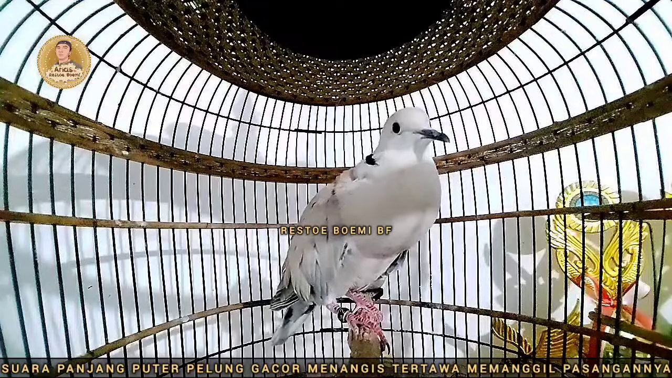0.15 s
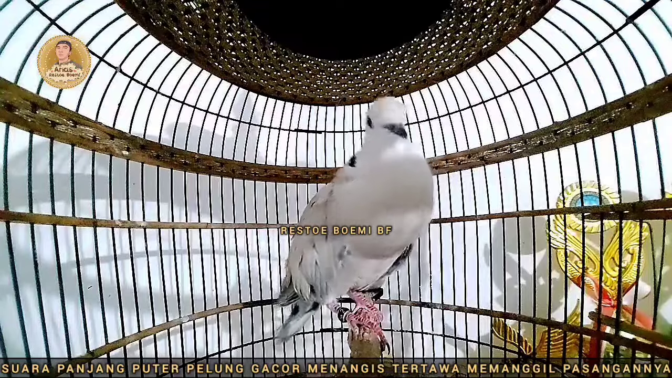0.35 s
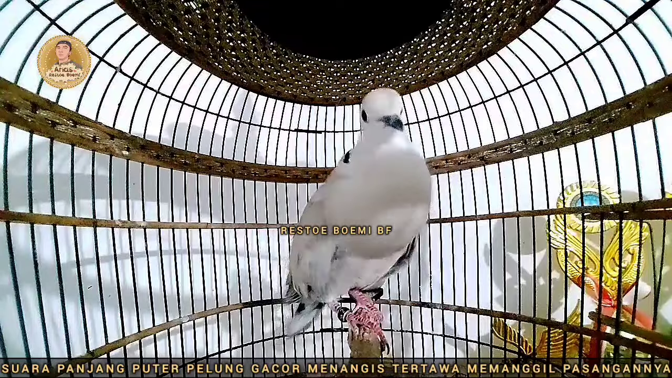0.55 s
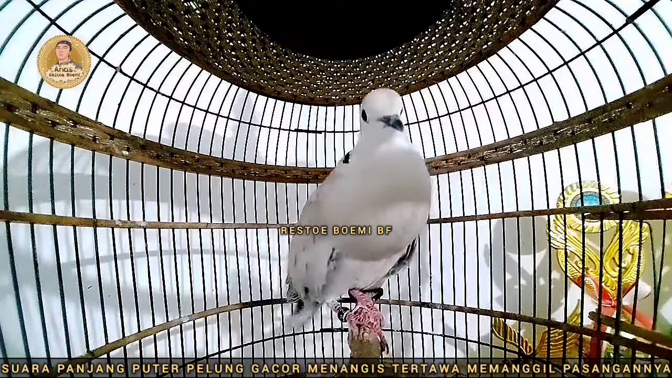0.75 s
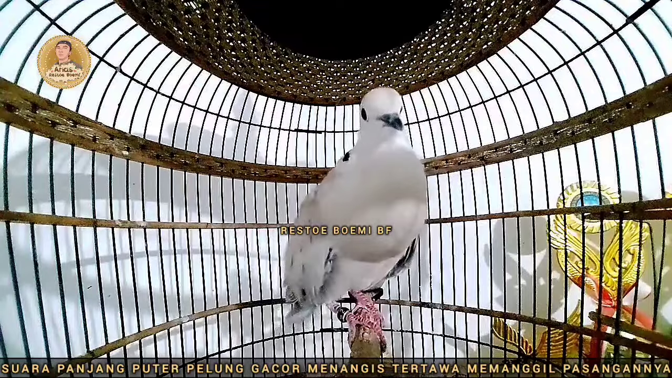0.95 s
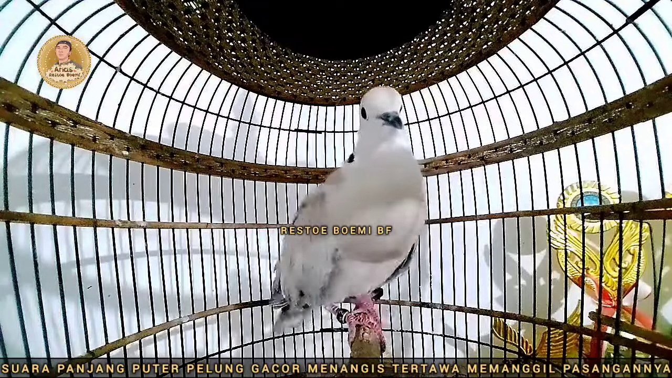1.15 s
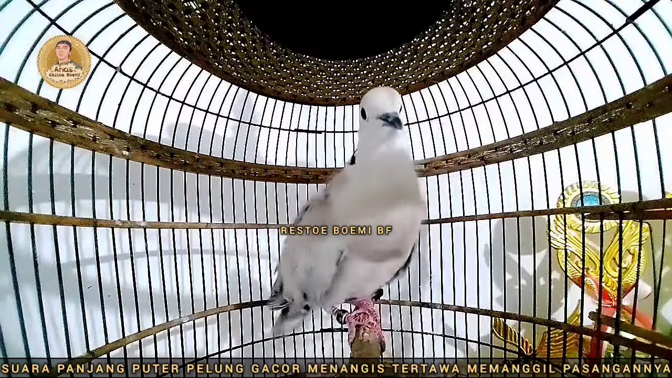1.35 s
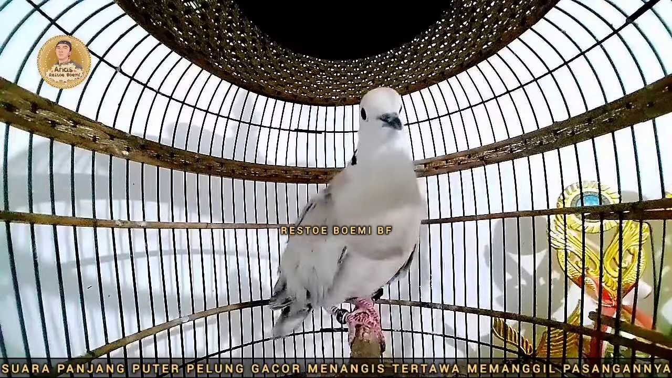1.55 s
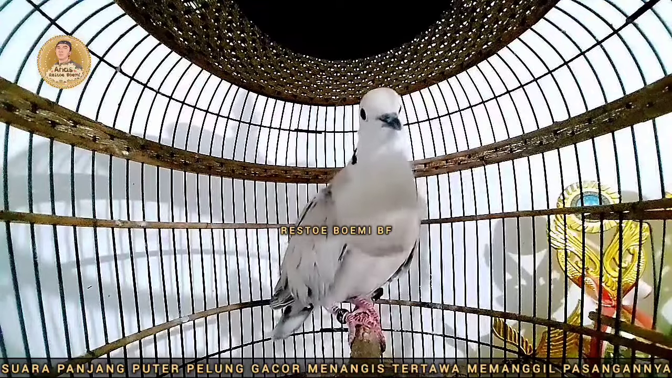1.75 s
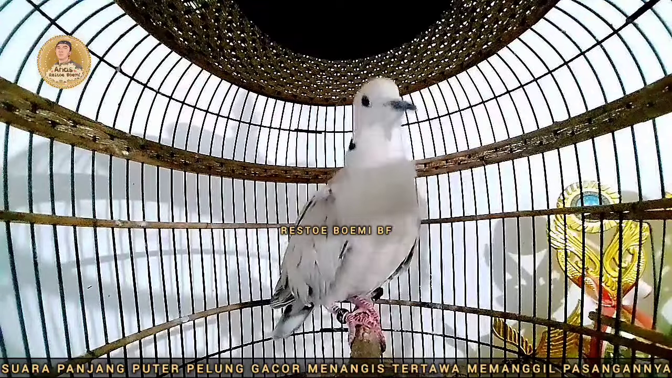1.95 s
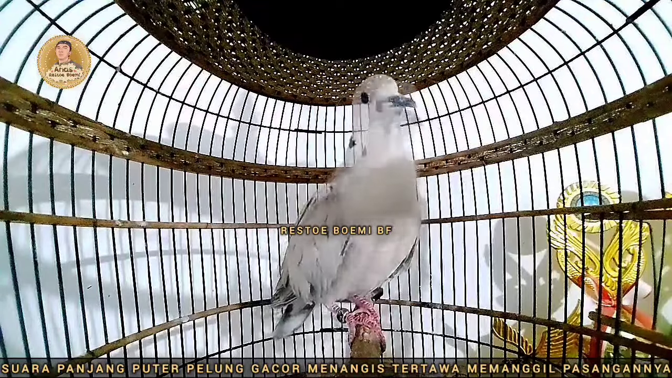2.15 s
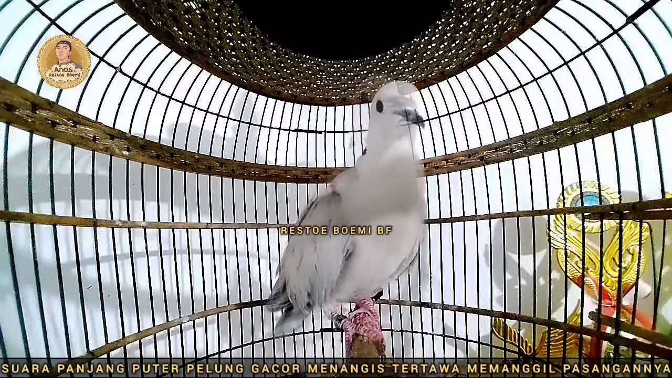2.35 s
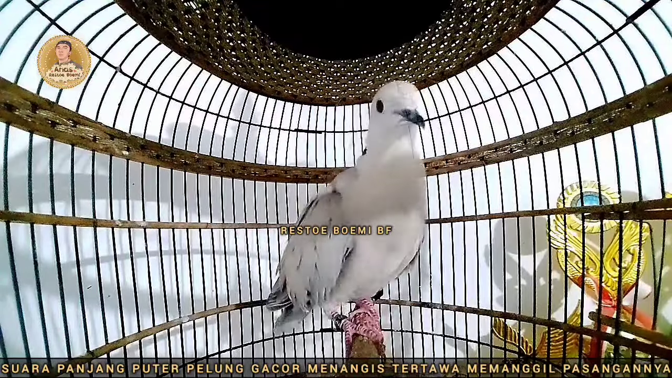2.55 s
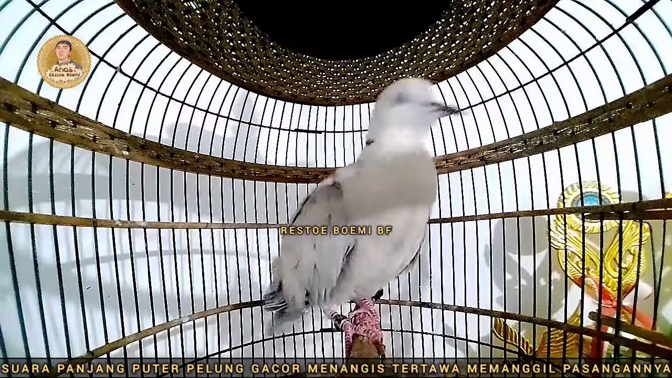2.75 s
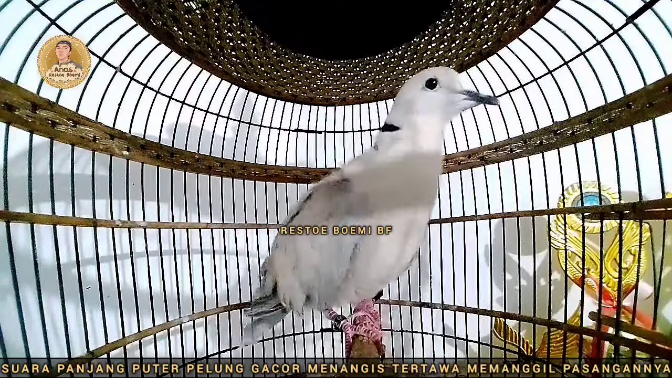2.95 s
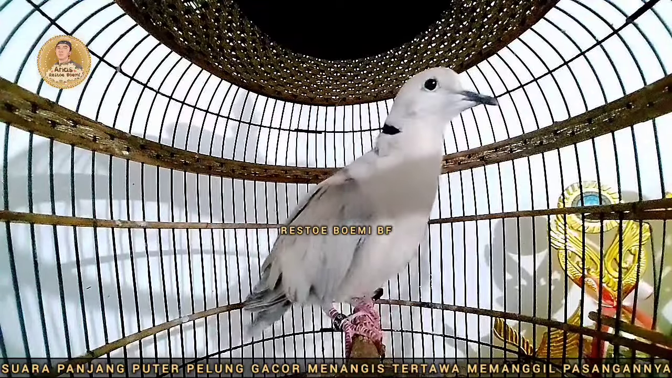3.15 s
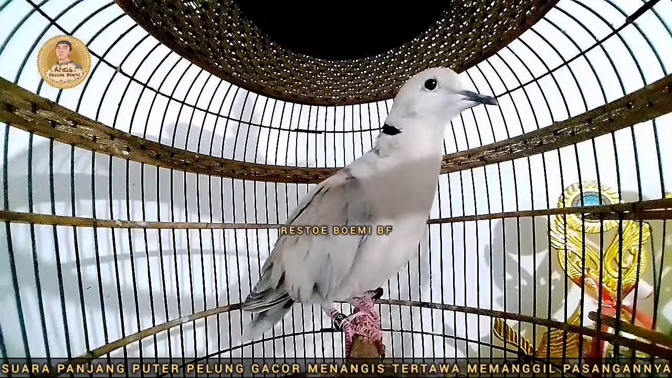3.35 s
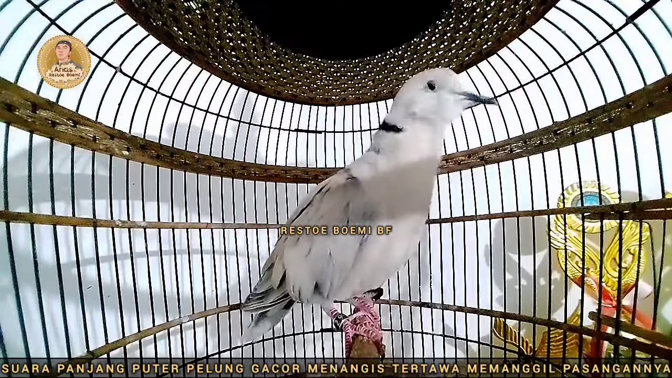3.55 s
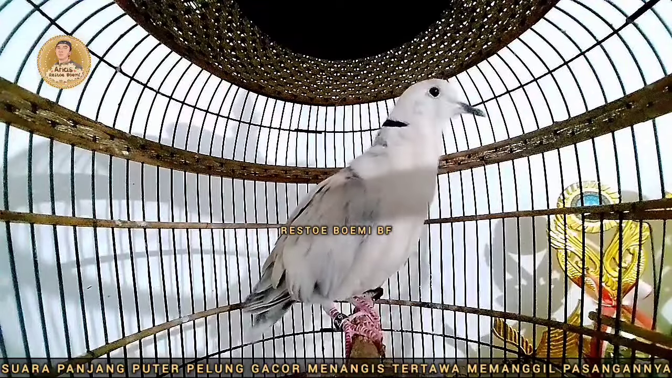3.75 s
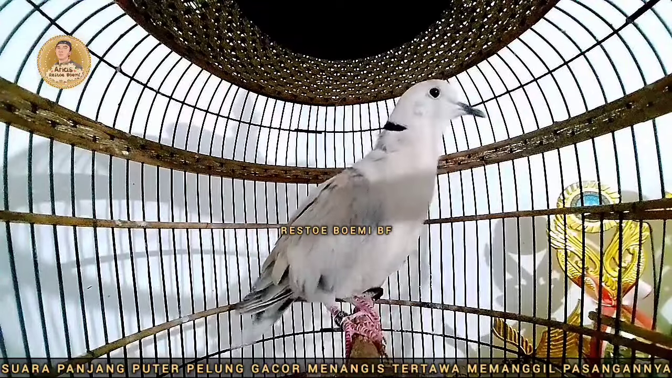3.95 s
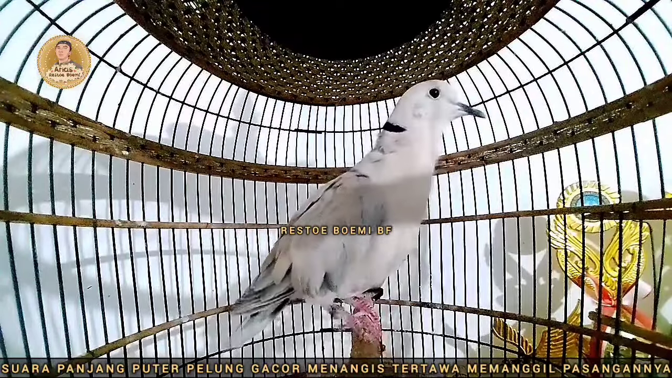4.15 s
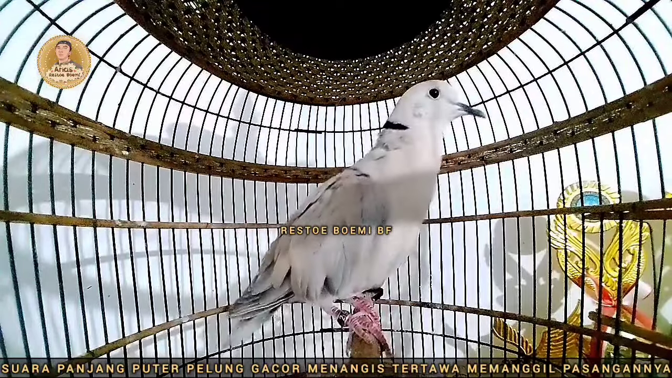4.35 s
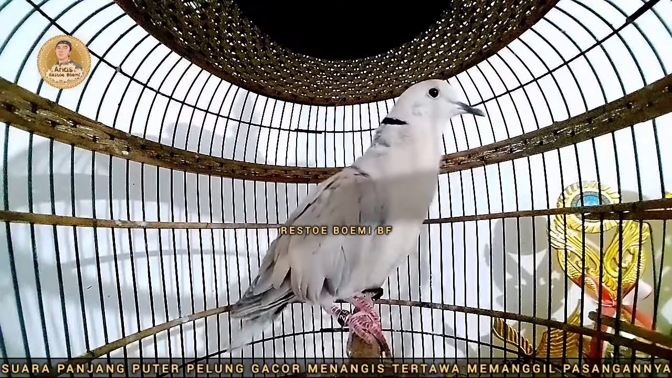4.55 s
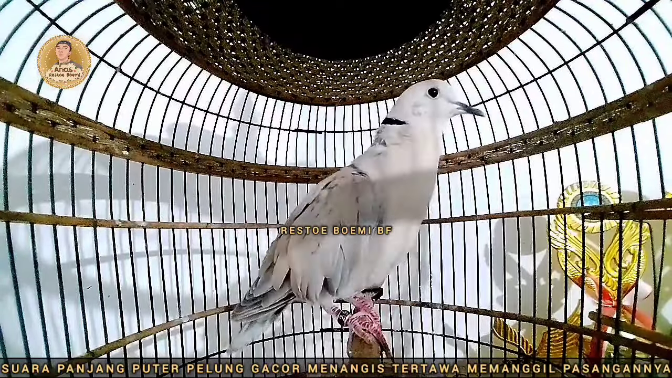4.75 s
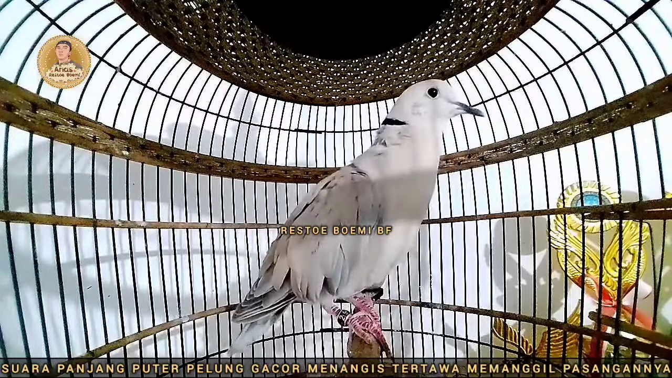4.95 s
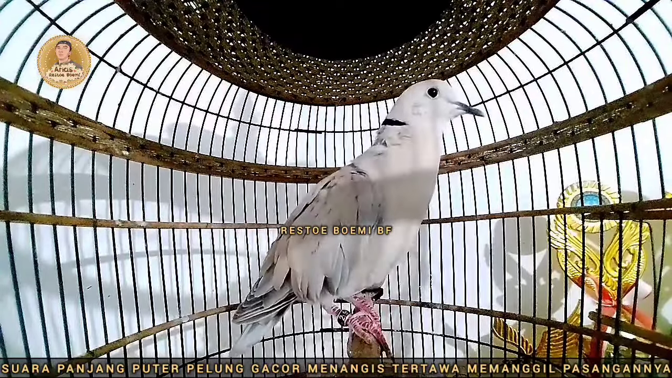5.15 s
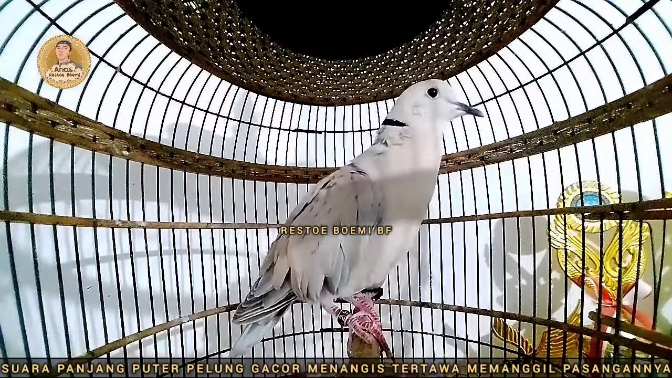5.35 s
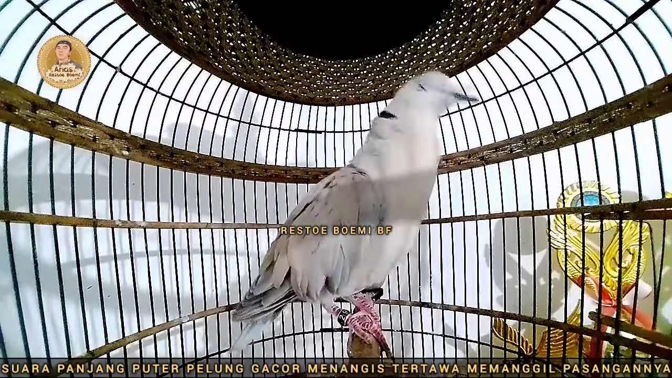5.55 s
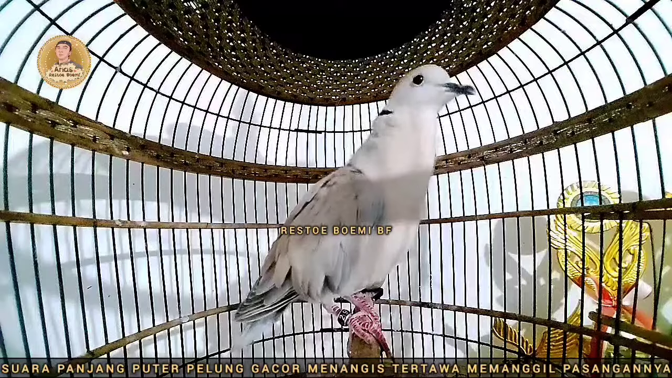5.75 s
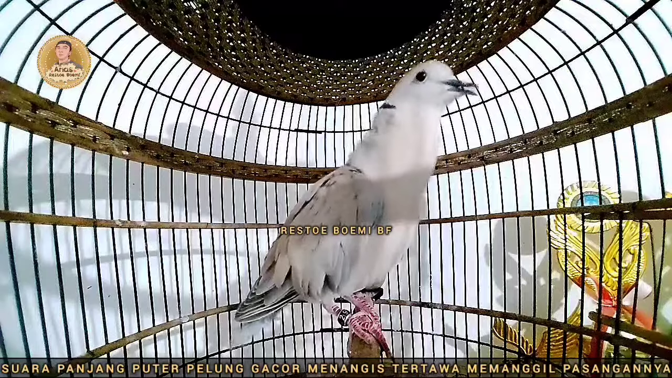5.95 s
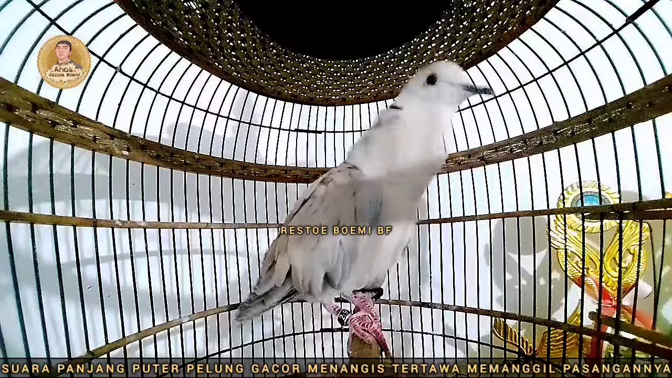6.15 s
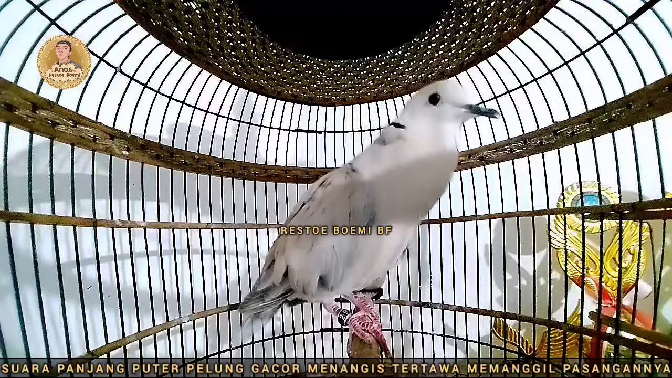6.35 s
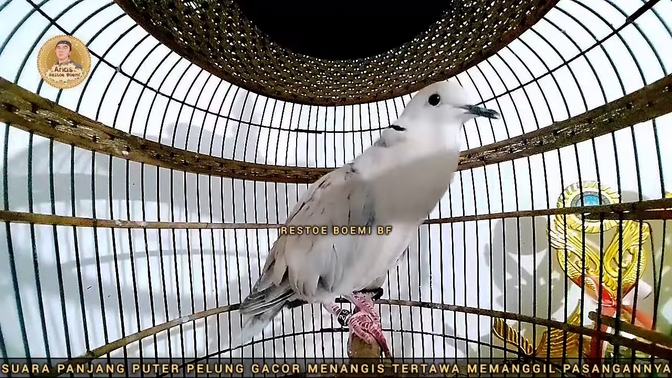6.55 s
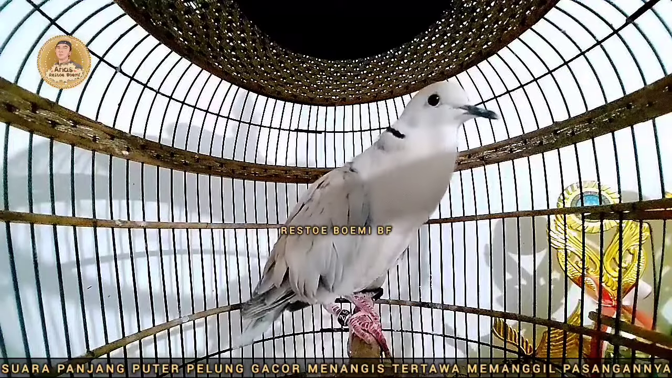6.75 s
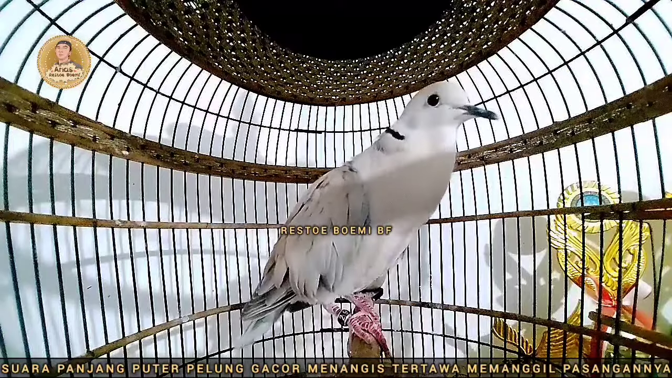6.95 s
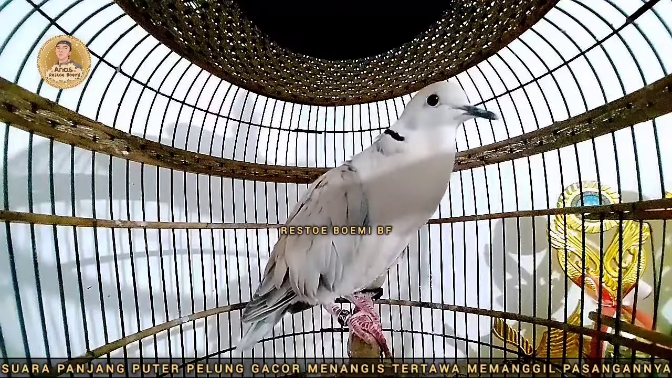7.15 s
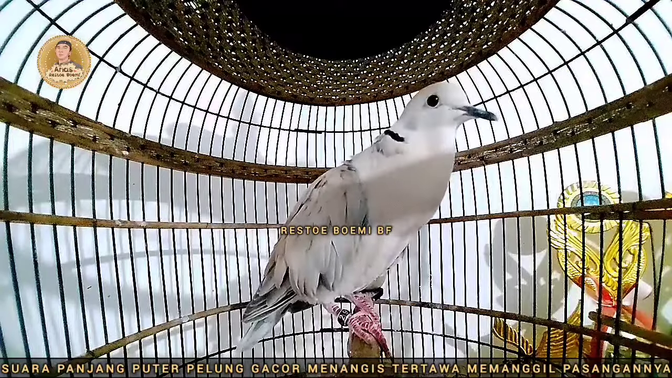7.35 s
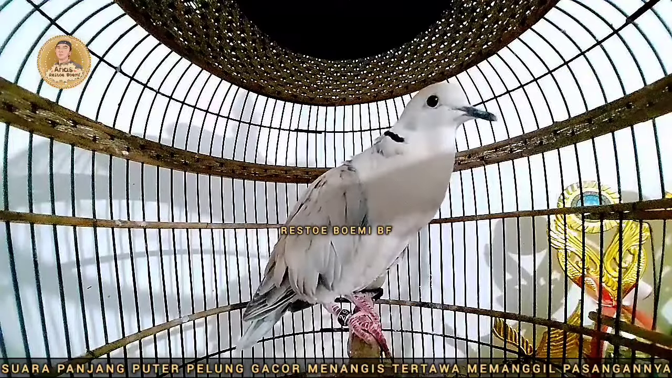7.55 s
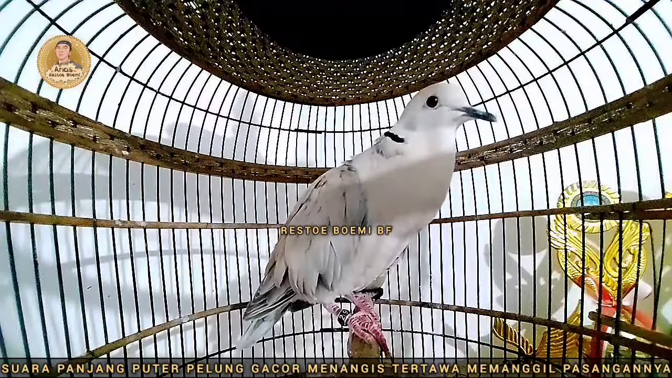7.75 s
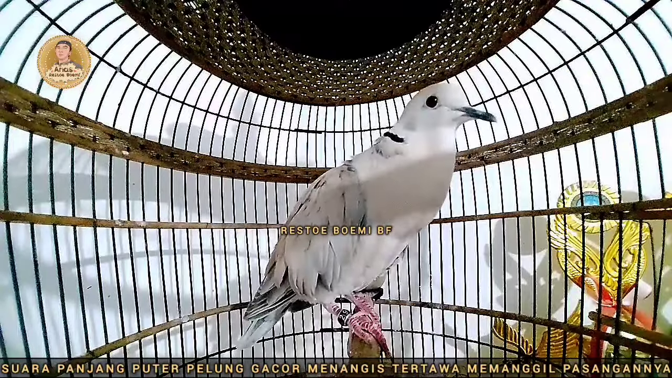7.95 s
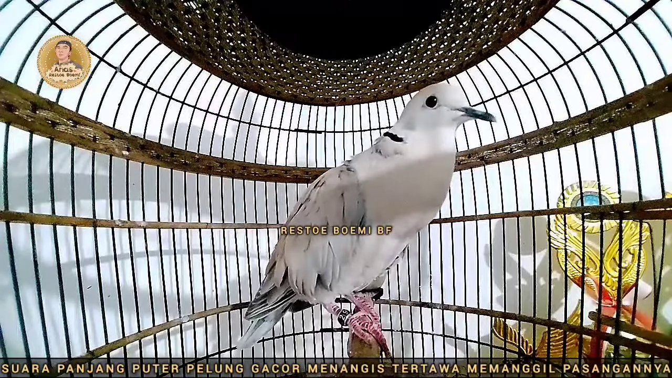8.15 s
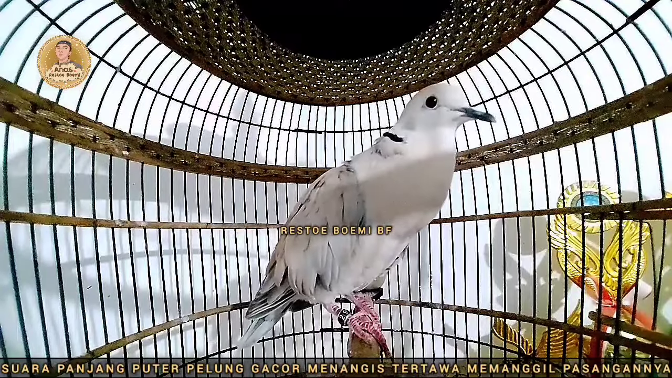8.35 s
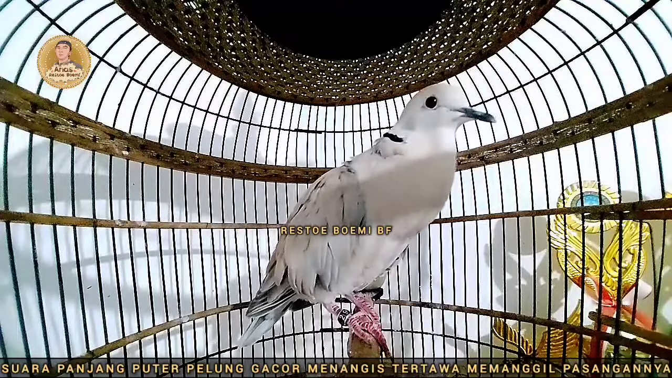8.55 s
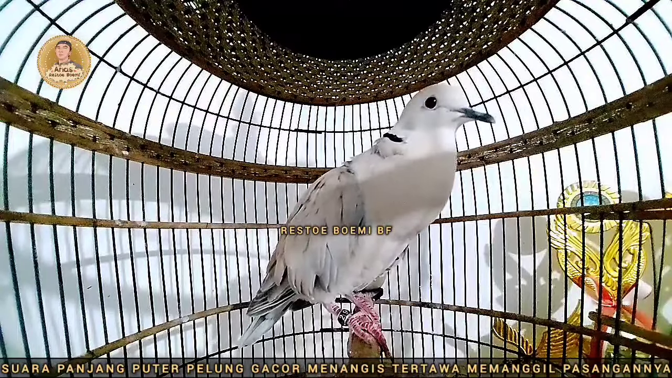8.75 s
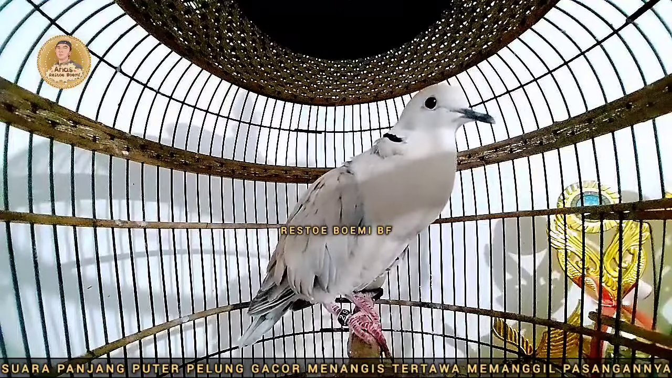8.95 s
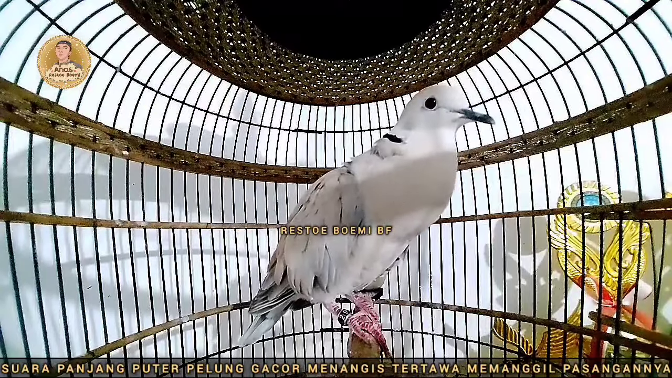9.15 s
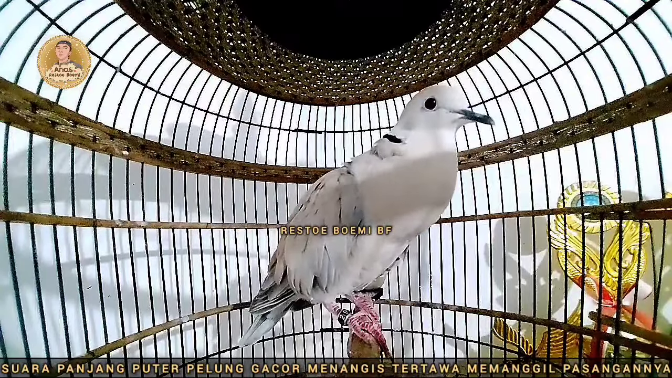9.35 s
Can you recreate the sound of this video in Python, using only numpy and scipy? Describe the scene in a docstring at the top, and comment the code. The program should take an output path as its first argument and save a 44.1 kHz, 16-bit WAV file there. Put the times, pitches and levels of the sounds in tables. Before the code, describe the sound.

A dove calls close to the microphone in a cage, with a short room tail, low outdoor rumble and faint hiss. At 0 s a brief low moan drops and fades; from 0.6 to 1.9 s a longer, reedy moan wavers and falls, with tiny beak and claw ticks. From 2.2 to 3.5 s comes a bouncing, buzzy laugh of nine quick swooping notes, rising in pitch then sinking and fading; it repeats at 4.5-5.8 s with similar ticks. Far off, another dove coos softly around 2 s and 3.5-6 s, and blurred echoing cries surface near 4 and 8 s. At 6.2 s a hoarse two-toned growl swells, breaks lower and sighs out by 6.8 s. Stuttered syllables lengthen from 6.9 s, opening at 7.4 s into a long hollow coo, slightly husky at first, growing louder, purer and steadier, creeping up in pitch and still held at about 9.4 s.

```python
"""Over a low rumble and faint hiss, a close caged dove gives two falling moans: harmonics swept through its crop.
From 2.2 s the same bouncing, buzzy laugh comes twice, while farther birds call as soft tones and echoing noise.
Past 6 s two beating voices rasp through a hoarse note, then a stutter that opens into one long coo, nearly
pure and ever steadier. Ticks of noise from the cage are scattered through the moans and both laughs."""
import sys
import numpy as np
from scipy import signal
from scipy.fft import rfft, irfft, next_fast_len
from scipy.io import wavfile
from scipy.ndimage import map_coordinates

SR = 44100
rng = np.random.default_rng(int(sys.argv[2]) if len(sys.argv) > 2 else 0)


def transcribe(u):
    """Save the signal u as a 16-bit wav file named by the first command-line argument.

    u: samples, shape (n,) or (channels, n), limited to [-1, 1]; the rate is SR.
    q: integer samples, one column per channel.
    """
    v = np.clip(np.atleast_2d(u).T, -1, 1)
    q = np.round(v * 32767).astype(np.int16)
    wavfile.write(sys.argv[1], SR, q)


N = 418509
TIME = np.arange(N) / SR
TOP_HZ = 15800  # band limit

# Slow rise and fall of the rumble: time_s, level_db
RUMBLE_LEVEL = [(.2, -54.5), (3.7, -55.5), (4.2, -50.5), (5.7, -56), (6.8, -54), (7.3, -50), (9.4, -48.5)]
# Spectrum of the outdoor rumble: frequency_hz, gain_db
RUMBLE = [(25, -17.5), (42, -1), (100, -1), (135, -6.5), (170, -20), (280, -23.5), (700, -35.5),
          (1500, -67)]
# Spectrum of the faint hiss: frequency_hz, gain_db
HISS = [(250, 10.5), (500, 29), (900, 9), (2000, -0.5), (5000, -9), (7500, -2), (10000, -5.5),
        (15000, -4.5)]
# Decay of the room tail: frequency_hz, t60_s
ROOM = [(500, 0.59), (8000, 0.019)]

# A farther dove, one list per coo: time_s, pitch_hz, level_db
FAR_COOS = [
    [(1.9, 438, -56.5), (2.3, 442, -55)],
    [(3.45, 558, -66.5), (4.1, 562, -46.5), (4.4, 560.6, -54.5), (4.9, 540.4, -48), (5.42, 517.6, -45.5),
     (6.12, 478, -69.5)],
]
# Echoing cries: start_s, end_s, level_db
FAR_CRIES = [(3.881, 4.251, -44.5), (7.901, 8.27, -42.5)]
# Spectrum of a cry: frequency_hz, gain_db
CRY = [(750, -24), (1000, -10.5), (1130, 6), (1350, -13.5), (1900, -47)]

# Ticks of beak and claws: start_s, level_db, body_db (low part relative to level_db)
TICKS = [(0.6646, -51, -10), (0.7043, -42, -10.5), (1.2458, -50.5, -21), (1.276, -45.5, 1.5),
         (2.073, -55.5, -7), (2.1173, -51, -14), (2.3329, -50, -8.5), (2.8298, -43, -12.5),
         (2.9582, -46.5, -15.5), (3.053, -50.5, -16.5), (3.4332, -48.5, -6.5)]
LAUGH_TICKS_FROM_S = 2  # later ticks belong to the laugh and come again with it

# Pitch and effort of the moans, one list per moan: time_s, pitch_hz, effort_db
MOANS = [
    [(0, 194.3, -19.5), (.13, 165.4, -31), (.255, 150.3, -37.5)],
    [(.625, 246, -41), (.69, 229, -33), (.89, 244.5, -31), (1.02, 234.5, -31.5), (1.2, 214.4, -29.5),
     (1.46, 190.1, -32.5), (1.69, 197.2, -31), (1.79, 189, -31.5), (1.92, 163, -54.5)],
]
# Gain of all harmonics but the second, one per moan: gain_db
MOAN_OVERTONE_DB = [-22.5, -0.5]
# Resonances of the swollen crop: centre_hz, half_width_hz, gain_db
CROP = [(252, 28, -10), (376.4, 78, -8), (484, 40.5, 1.5), (635.7, 26.4, 4), (784, 31, -8.5),
        (875, 40, -22.5), (1040, 77, -25)]
# Throat colour of the moan's buzz: frequency_hz, gain_db
MOAN_BUZZ = [(1400, 3), (1700, 1), (2000, -20), (2420, -1.5), (2900, -10.5), (3950, -12.5), (4330, 5),
             (4750, -41), (6200, -38), (7000, -3), (8200, -30), (9300, -9.5), (10500, -31)]
MOAN_BUZZ_DB, MOAN_BUZZ_HZ = -27, 246.6  # buzz over effort, at this pitch
MOAN_BUZZ_DB_PER_HZ = 0.46  # growth of the buzz with pitch
MOAN_BUZZ_RISE_S = 0.21  # the buzz comes in late

# Notes of the laugh: catch_s, top_hz, level_db, buzz_db
LAUGH = [(2.284, 545, -39, -47.5), (2.393, 610, -36, -46), (2.528, 640, -36.5, -43), (2.673, 672, -37, -41),
         (2.83, 640, -37.5, -42.5), (3.006, 626, -40.5, -49), (3.179, 592, -41, -53.5),
         (3.358, 505, -47.5, -60.5), (3.516, 395, -64.5, -68.5)]
# Delay of each laugh: delay_s
LAUGH_DELAYS = [0, 2.2498]
# Throat colour of the laugh's buzz and air: frequency_hz, gain_db
LAUGH_BUZZ = [(900, 4), (1250, -2), (1550, -7.5), (1850, -7.5), (2100, -9), (2550, 0), (3200, -1),
              (4500, -6), (5100, -12), (5600, -20), (7000, -22.5), (9000, -30.5), (15000, -31)]
LAUGH_START_S, LAUGH_END_S = 2.223, LAUGH[-1][0]
FALL_S, FIRST_FALL_S = .057, .044  # from a catch to the next note; shorter at the outset
DIP_HZ, FIRST_DIP_HZ = 359.5, 472  # where each fall lands; higher at the outset
SETTLE_S = 0.23  # time constant of both as the laugh goes on
JUMP_RATIO, JUMP_LOSS_PER_S = 1.14, .12  # pitch ratio across a catch, and how it shrinks
SWOOP_S, DROP_S, CATCH_S = .031, .036, 0.0067  # time scales of the rise, the fall and the closure
LAUGH_AIR_DB, FALL_AIR_DB = -17, 4.5  # air against buzz; more of it after the catch

# The growl swells, breaks to its low voice and sighs out: time_s, low_voice_hz, low_voice_db, high_voice_db
GROWL = [(6.164, 385.4, -46, -37), (6.29, 329.6, -36, -24), (6.428, 324.5, -38.5, -23.5),
         (6.438, 454, -19.5, -36), (6.509, 444.2, -22.5, -30.5), (6.53, 447.6, -32, -53),
         (6.73, 441.2, -45.5, -66), (6.801, 428, -69.5, -84)]
# Stuttered syllables: start_s, end_s, level_db
STUTTER = [(6.906, 6.917, -38.5), (6.97, 6.981, -33.5), (7.022, 7.058, -31.5), (7.09, 7.14, -29.5),
           (7.162, 7.227, -26.5), (7.273, 7.402, -23.5)]
# Throat colour of the rasp: frequency_hz, gain_db
RASP = [(700, -3.5), (900, 4.5), (1150, -16.5), (1600, 4), (1800, -10.5), (2100, -23), (4000, -31),
        (5000, -17), (5900, -28.5), (7500, -23), (12000, -35)]
HIGH_VOICE_HZ = 613.5  # the upper side of the syrinx in hoarse sounds
ROUGH_LOW, ROUGH_HIGH = 0.29, .65  # roughness (0-1) when the low or the high voice leads
CLEAN_UNDER_DB = -28  # the low voice alone clears as it fades under this level
STUTTER_HZ, STUTTER_RISE_HZ_PER_S = 394.3, 130  # the low voice climbs toward the coo
STUTTER_HIGH_DB, STUTTER_HIGH_DB_PER_S = 8, -44.5  # the high voice against the low one, giving way
STUTTER_HIGH_MIN_DB = -9  # the high voice never quite stops
KICK_DB, KICK_S = 4.5, .008  # each syllable bursts open
STUTTER_LEAK_DB = -22.5  # what still sounds between syllables

# Pitch and level of the long coo: time_s, pitch_hz, level_db
COO = [(7.39, 457.7, -20), (7.42, 475.9, -18), (7.49, 477.8, -17.5), (7.53, 469.9, -20.5),
       (7.71, 453.3, -17.5), (8.04, 457.6, -16.5), (8.09, 461.3, -16), (8.21, 460.2, -18),
       (8.34, 471.6, -14.5), (8.43, 473.5, -18), (8.51, 480.5, -17.5), (8.71, 478.8, -12.5),
       (8.94, 489.8, -12), (9.47, 491.8, -12.5)]
# Throat colour of the coo's thin overtones and air: frequency_hz, gain_db
COO_BUZZ = [(1850, -2.5), (2350, -5), (3250, -9), (3750, -26), (4550, 5), (5600, -20.5), (7600, -2),
            (9000, -21.5), (14000, -35)]
# Spectrum of the husky noise around the tone: frequency_hz, gain_db
COO_HUSK = [(100, -29), (190, -10), (300, -20), (460, -5), (580, 9.5), (720, -23.5), (1500, -23),
            (2500, -61)]
COO_RING_HZ, COO_RING_WIDTH_HZ, COO_RING_DB = 1442, 50, -32.5  # a resonance that lifts the third harmonic
COO_ROUGH_START, COO_STEADY_S = 0.49, .9  # roughness (0-1) and the time constant of its decay
COO_BUZZ_DB, COO_BUZZ_DB_PER_S = -60.5, -2.5  # thin overtones, slowly fading


def amp(db):
    """Decibels to gain."""
    return 10 ** (np.asarray(db) / 20)


def unit(x):
    """Scale to rms 1."""
    return x / np.sqrt(np.mean(x ** 2) + 1e-20)


def along(points, hz):
    """Read (frequency_hz, value) points on a log axis."""
    f, v = np.transpose(points)
    return np.interp(np.log(hz + 1), np.log(f), v)


def curves(rows, t):
    """Each column after the time, read at times t."""
    s, *cols = np.transpose(rows)
    return [np.interp(t, s, c) for c in cols]


def gate(t, start, end, edge):
    """1 from start to end, with soft edges."""
    return (np.tanh((t - start) / edge) - np.tanh((t - end) / edge)) / 2


def span(start, end):
    """Sample indices around a call, with 50 ms to spare on either side."""
    return np.flatnonzero((TIME > start - .05) & (TIME < end + .05))


def wobble(t, rate):
    """A smooth random curve, rate knots a second."""
    at = (t - t[0]) * rate
    knots = rng.standard_normal(int(at[-1]) + 4)
    return map_coordinates(knots, [at + 1])


def cycle(hz):
    """Phase of an oscillator that follows hz."""
    return 2 * np.pi * np.cumsum(hz) / SR


def filtered(x, response):
    """x times a response of frequency."""
    m = next_fast_len(N + SR // 2)
    return irfft(rfft(x, m) * response(np.fft.rfftfreq(m, 1 / SR)), m)[..., :N]


def noise(spectrum, width):
    """Coloured stereo noise of rms 1; width is side over mid."""
    white = rng.standard_normal((2, N))
    mid, side = filtered(white, lambda hz: amp(along(spectrum, hz)))
    return unit(np.array([mid + width * side, mid - width * side]))


def resonance(hz, centre_hz, half_width_hz):
    """Gain of a steep resonance: 1 at its centre, half at half_width_hz away."""
    return 1 / (1 + ((hz - centre_hz) / half_width_hz) ** 2)


def buzz(phase, hz, throat, order, count):
    """Harmonics order to count - 1, shaped by the throat, at rms 1; each swells and fades on its own."""
    t = TIME[:len(phase)]
    total = 0
    for k in range(order, count):
        drift_db = 3 * wobble(t, 9)
        level = amp(along(throat, k * hz) + drift_db) * (k * hz < TOP_HZ)
        total = total + level * np.sin(k * phase + rng.uniform(0, 2 * np.pi))
    return unit(total)


def background():
    """Low outdoor rumble whose level drifts, and a faint steady hiss, both of filtered noise."""
    rumble_db, = curves(RUMBLE_LEVEL, TIME)
    rumble = amp(rumble_db) * noise(RUMBLE, .38) * amp([[-1.5], [1.5]])  # leans right
    return rumble + amp(-65) * noise(HISS, 0.16)


def room(x):
    """A short diffuse tail, different at each ear: noise that decays faster in the treble."""
    hz, t, z = signal.stft(rng.standard_normal((2, SR // 2)), SR, nperseg=256)
    decay = amp(-60 * t / along(ROOM, hz)[:, None])
    tail = signal.istft(z * decay, SR, nperseg=256)[1]
    return signal.fftconvolve(x[None], tail / np.linalg.norm(tail[0]), axes=1)[:, :N]


def far_birds():
    """Soft held coos of another dove as wavering sines, and two cries blurred by echo into noise."""
    out = np.zeros((2, N))
    for rows in FAR_COOS:
        start, end = rows[0][0], rows[-1][0]
        i = span(start, end)
        t = TIME[i]
        hz, db = curves(rows, t)
        level = np.sqrt(2) * amp(db + 2.7 * wobble(t, 29.86))
        tone = np.sin(cycle(hz * (1 + 0.014 * wobble(t, 60))))
        out[:, i] += level * tone * gate(t, start, end, 0.0146)
    for start, end, db in FAR_CRIES:
        rise = np.clip((TIME - start) / 0.23, 0, 1)
        echo_db = -45 * np.maximum(TIME - end, 0)
        out += rise * amp(db + echo_db) * noise(CRY, 1.0)
    return out


def ticks():
    """Beak and claws tick lightly in the cage: dying noise, low and high; each laugh brings the same ticks."""
    low, high = np.zeros(N), np.zeros(N)
    for s, db, body_db in TICKS:
        for delay in LAUGH_DELAYS if s > LAUGH_TICKS_FROM_S else [0]:
            i = span(s + delay, s + delay + .05)
            age = TIME[i] - s - delay
            snap = amp(-60 * np.abs(age) / 0.019)  # seconds to fall 60 dB
            ring = amp(-7 - 60 * np.abs(age) / 0.13)
            fade = (age > 0) * (snap + ring)
            high[i] += amp(db - 10.5) * fade
            low[i] += amp(db + body_db - 4.0) * fade
    body = noise([(1000, -25.0), (2400, -6.5), (4500, -2), (6500, -19.5)], .3)
    click = noise([(3000, -22.0), (5200, 1), (15000, -8.5)], 0.44)
    return low * body + high * click


def moans():
    """The syrinx beats at about half the coo's pitch; harmonics swell as they slide through crop resonances."""
    out = np.zeros(N)
    for rows, overtone_db in zip(MOANS, MOAN_OVERTONE_DB):
        start, end = rows[0][0], rows[-1][0]
        i = span(start, end)
        t = TIME[i]
        hz, effort_db = curves(rows, t)
        phase = cycle(hz * (1 + 0.012 * wobble(t, 150) + 0.0037 * wobble(t, 25)))
        voice = 0
        for k in range(1, 8):
            power = sum((amp(db) * resonance(k * hz, centre, width)) ** 2 for centre, width, db in CROP)
            flutter = amp(overtone_db * (k != 2) + 1.2 * wobble(t, 66))
            voice = voice + np.sqrt(2 * power) * flutter * np.sin(k * phase)
        press = np.clip((t - start) / MOAN_BUZZ_RISE_S, 0, 1) ** 2
        buzz_db = MOAN_BUZZ_DB + MOAN_BUZZ_DB_PER_HZ * (hz - MOAN_BUZZ_HZ) + 1.5 * wobble(t, 30)
        voice += press * amp(buzz_db) * buzz(phase, hz, MOAN_BUZZ, order=5, count=46)
        out[i] += amp(effort_db) * voice * gate(t, start, end, 0.0022)
    return out


def laugh_notes():
    """Rows time_s, pitch_hz, level_db, buzz_db, air_db: each note swoops up, catches and drops into the next."""
    rows, start, low_hz = [], LAUGH_START_S, FIRST_DIP_HZ
    for catch, top_hz, db, buzz_db in LAUGH:
        age = catch - LAUGH_START_S
        fresh = np.exp(-age / SETTLE_S)
        end = catch + FALL_S + (FIRST_FALL_S - FALL_S) * fresh
        next_hz = DIP_HZ + (FIRST_DIP_HZ - DIP_HZ) * fresh
        after_hz = top_hz * (JUMP_RATIO - JUMP_LOSS_PER_S * age)
        s = np.linspace(start, end, 60, endpoint=False)
        rising = s < catch
        slack = np.exp(-np.where(rising, (s - start) / SWOOP_S, (end - s) / DROP_S) ** 2)
        climb = 0.59 * slack + 0.18 * (catch - s) / (catch - start)  # a fast swoop, then a slow creep upward
        rise_hz = top_hz + (low_hz - top_hz) * climb
        fall_hz = after_hz + (next_hz - after_hz) * slack
        hz = np.where(rising, rise_hz, fall_hz)
        closed = np.exp(-((s - catch) / CATCH_S) ** 4)
        sag = np.log2(top_hz / hz).clip(0)  # octaves under the top of the note
        level_db = db - 24 * sag ** 2 - 2.3 * slack - 18 * closed
        bright_db = buzz_db - 27 * sag - 5 * slack - 17 * closed + 3 * ~rising
        air_db = bright_db + LAUGH_AIR_DB + FALL_AIR_DB * ~rising
        rows += list(zip(s, hz, level_db, bright_db, air_db))
        start, low_hz = end, next_hz
    return rows


def laugh(delay):
    """A run of bouncing notes; buzz and rushing air grow as the pitch climbs."""
    i = span(LAUGH_START_S + delay, LAUGH_END_S + delay)
    t = TIME[i] - delay
    hz, db, buzz_db, air_db = curves(laugh_notes(), t)
    phase = cycle(hz * (1 + .009 * wobble(t, 400) + .004 * wobble(t, 60)))
    flutter = amp(1.6 * wobble(t, 80))
    voice = np.sqrt(2) * amp(db) * flutter * np.sin(phase)
    voice += amp(buzz_db - 1.5) * flutter * buzz(phase, hz, LAUGH_BUZZ, order=2, count=30)
    voice += amp(air_db) * noise(LAUGH_BUZZ, 0)[0, i] * (1 + np.sin(phase))  # chopped each cycle
    out = np.zeros(N)
    out[i] = voice * gate(t, LAUGH_START_S + 0.0024, LAUGH_END_S, 0.00074)
    return out


def two_voices(t, low_hz, low_db, high_db):
    """Both sides of the syrinx as one complex tone; the more the high side leads, the rougher."""
    high_share = amp(high_db) / (amp(low_db) + amp(high_db))
    low_rough = ROUGH_LOW * np.tanh(amp(low_db - CLEAN_UNDER_DB))
    rough = low_rough * (1 - high_share) + ROUGH_HIGH * high_share
    pair = 0
    for hz, db in (low_hz, low_db), (HIGH_VOICE_HZ, high_db):
        phase = cycle(hz * (1 + 0.061 * rough * wobble(t, 120))) + rng.uniform(0, 2 * np.pi)
        shake = 1 + 0.8 * rough * (wobble(t, 150.66) + 1j * wobble(t, 150))
        pair = pair + amp(db) * shake * np.exp(1j * phase)
    return np.sqrt(2) * pair


def growl():
    """One hoarse note that swells on the high voice and breaks to the low one."""
    start, end = GROWL[0][0], GROWL[-1][0]
    i = span(start, end)
    t = TIME[i]
    out = np.zeros(N, complex)
    out[i] = two_voices(t, *curves(GROWL, t)) * gate(t, start, end, 0.0027)
    return out


def stutter():
    """Ever longer syllables, mostly growing louder, in which the low voice climbs and takes over."""
    first, last = STUTTER[0][0], STUTTER[-1][1]
    i = span(first, last)
    t = TIME[i]
    _, between_db = curves(STUTTER, t)
    opening = amp(STUTTER_LEAK_DB + between_db) * gate(t, first, last, .0015)
    for start, end, db in STUTTER:
        kick_db = KICK_DB * np.exp(-np.abs(t - start) / KICK_S)
        opening += amp(db + kick_db) * gate(t, start, end, .0014)
    high_db = np.maximum(STUTTER_HIGH_DB + STUTTER_HIGH_DB_PER_S * (t - first), STUTTER_HIGH_MIN_DB)
    pair = two_voices(t, STUTTER_HZ + STUTTER_RISE_HZ_PER_S * (t - first), 0, high_db)
    out = np.zeros(N, complex)
    out[i] = opening * pair / np.hypot(1, amp(high_db))  # same power however the voices share it
    return out


def hoarse():
    """The two sides of the syrinx beat against each other; their uneven closures rasp in the throat."""
    pair = growl() + stutter()
    i = span(GROWL[0][0], STUTTER[-1][1])
    rasp = np.zeros(N)
    angle = np.angle(pair[i])
    rasp[i] = np.abs(pair[i]) * sum(np.cos(k * angle) for k in range(2, 18))
    return pair.real + amp(-34.5) * filtered(rasp, lambda hz: amp(along(RASP, hz)))


def coo():
    """A nearly pure tone from the swollen crop; it steadies as it grows."""
    start = COO[0][0]
    i = span(start, N / SR)
    t = TIME[i]
    hz, db = curves(COO, t)
    rough = COO_ROUGH_START * np.exp(-(t - start) / COO_STEADY_S)
    buzz_db = COO_BUZZ_DB + COO_BUZZ_DB_PER_S * (t - start)
    phase = cycle(hz * (1 + 0.0028 * wobble(t, 22))) + 0.2 * rough * wobble(t, 110)
    second = amp(-42.0 + 21 * rough)
    ring = resonance(3 * hz, COO_RING_HZ, COO_RING_WIDTH_HZ)
    third = amp(COO_RING_DB + 12 * rough + wobble(t, 25)) * ring
    tone = np.sin(phase) + second * np.sin(2 * phase) + third * np.sin(3 * phase)
    voice = np.sqrt(2) * amp(db) * tone
    voice += amp(buzz_db + 1.4 * wobble(t, 40)) * buzz(phase, hz, COO_BUZZ, order=4, count=24)
    voice += amp(buzz_db - 6.5) * noise(COO_BUZZ, 0)[0, i]  # air
    voice += amp(db - 13) * rough * noise(COO_HUSK, 0)[0, i]
    flutter = 1 + 0.33 * rough * wobble(t, 90) + 0.054 * wobble(t, 22)
    out = np.zeros(N)
    out[i] = voice * flutter * gate(t, start + .004, np.inf, .002)
    return out


def scene():
    """The dove sits near the middle; its hoarse notes and coo reach the right ear a moment sooner."""
    moan, rasping, held = moans(), hoarse(), coo()
    laughs = sum(laugh(delay) for delay in LAUGH_DELAYS)
    lead_s = np.array([[-1], [1]]) * 2.5e-5  # left, right
    song = filtered(rasping + held, lambda hz: np.exp(2j * np.pi * hz * lead_s)) * amp([[.4], [-.4]])
    direct = moan * amp([[1.1], [-1.1]]) + laughs + song
    reflected = amp(-18) * moan + amp(-23) * laughs + amp(-16) * rasping + amp(-25) * held
    return direct + room(reflected) + far_birds() + ticks() + background()


def record(dry):
    """Nothing is kept above the band limit."""
    return filtered(dry, lambda hz: hz < TOP_HZ)


dry = scene()
out = record(dry)
transcribe(out)
```